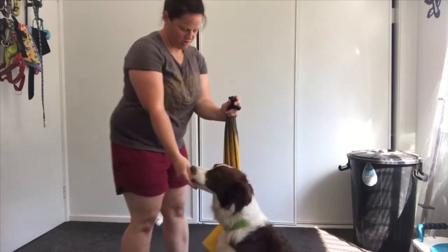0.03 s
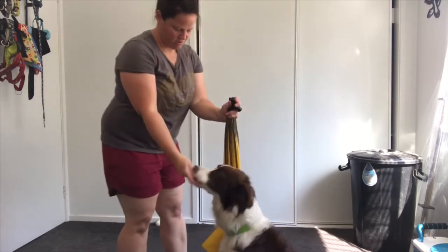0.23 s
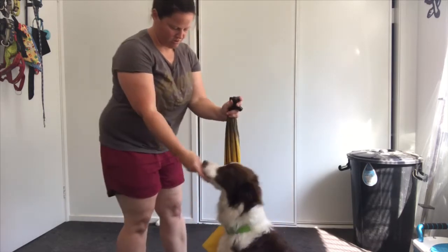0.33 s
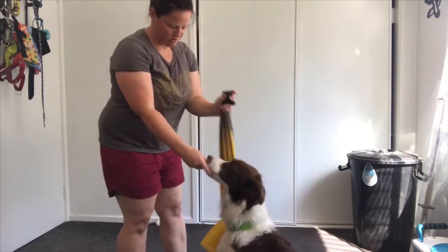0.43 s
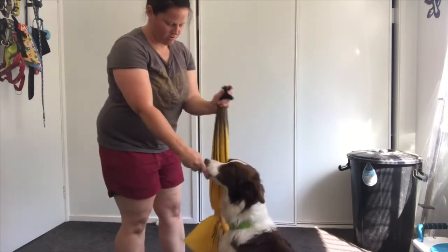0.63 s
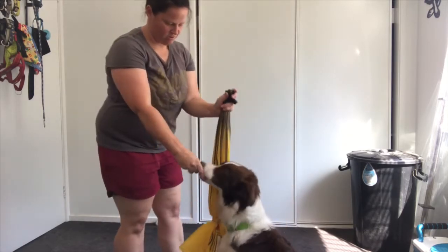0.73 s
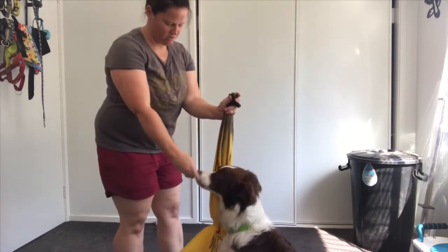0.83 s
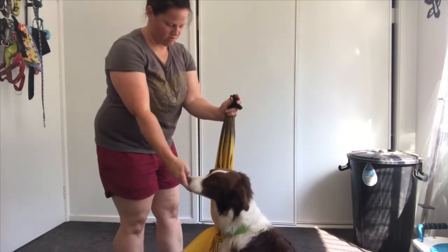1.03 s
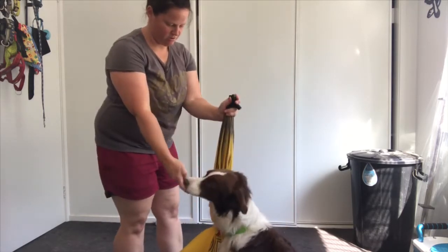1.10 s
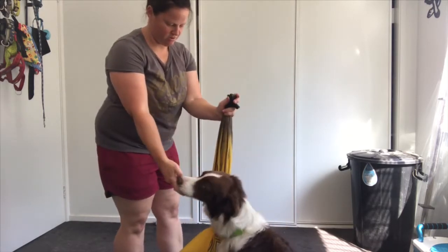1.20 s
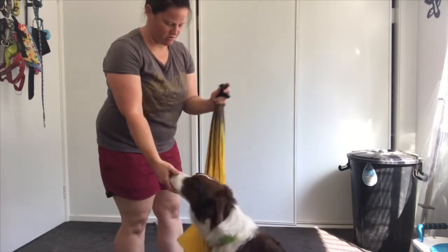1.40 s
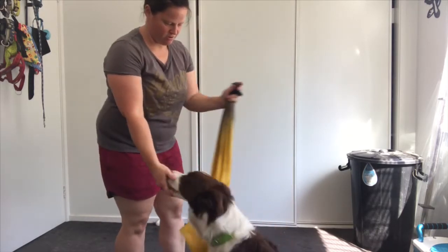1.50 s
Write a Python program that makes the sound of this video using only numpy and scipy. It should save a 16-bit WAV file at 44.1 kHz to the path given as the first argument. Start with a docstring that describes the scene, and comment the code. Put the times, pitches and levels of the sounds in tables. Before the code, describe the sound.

A hand-held training clicker snaps sharply at about 0.2 seconds and springs back, slightly brighter, at 0.35. A second pair follows at about 1.05 and 1.25 seconds, just as loud. Each metallic click leaves a brief small-room echo. Very faint rustling of a dog and handler runs underneath, with a soft bump near 0.6 and light scuffs around 0.8 and 1 second, over quiet room noise and a low hum.

```python
"""In a small, hard-walled room, a hand-held training clicker is pressed and let go twice.
Its steel tongue snaps through and rings for a few milliseconds, with one set of tones going in
and another coming back; the room's echo carries each snap on. Underneath are faint rustles
of a dog and its handler moving, room noise and a low hum."""
import sys
import numpy as np
from scipy import signal
from scipy.fft import rfft, irfft, next_fast_len
from scipy.io import wavfile
from scipy.ndimage import map_coordinates

SR = 44100
rng = np.random.default_rng(int(sys.argv[2]) if len(sys.argv) > 2 else 0)


def generate_wav(sig):
    """Save sig (samples, or channels by samples) to the path in sys.argv[1] as 16-bit PCM at SR."""
    pcm = np.round(np.clip(np.atleast_2d(sig).T, -1, 1) * 32767).astype(np.int16)
    wavfile.write(sys.argv[1], SR, pcm)


N = 68355

# the tongue buckles in, and springs back (t/s, level/dB)
PRESS_SNAPS = [(.2025, -0.5), (1.0725, -0.67)]
RELEASE_SNAPS = [(.3578, -0.4), (1.2410, -0.88)]
# ringing tones of tongue and case; wider ones die sooner (f/Hz, half width/Hz, level/dB)
BENT_TONES = [(1890, 303, 1), (3310, 750, -1.9), (4136, 163, 13), (4610, 200, -2.5), (5610, 340, 4.5),
              (6250, 220, 2), (7630, 650, 0.6), (8740, 480, 6), (9620, 190, 3.5), (11250, 240, 5),
              (11960, 590, -4.3), (14040, 1200, -3.0)]  # mainly near 4 kHz
RELAXED_TONES = [(1996, 363, 4.5), (3106, 270, 4.5), (3730, 1300, 0.2), (4340, 430, -1), (5390, 153, 4.7),
                 (5916, 437, 9), (7170, 280, -2.3), (8450, 210, 4), (9070, 720, -2.5), (11080, 276, 9),
                 (11500, 430, 8.5), (12460, 750, -1.5), (14300, 460, 0.5)]  # mainly near 6 and 11 kHz
def clicker():
    """The tongue snaps on every press and release, each time with a slightly different echo."""
    out = np.zeros(N)
    for events, tones in (PRESS_SNAPS, BENT_TONES), (RELEASE_SNAPS, RELAXED_TONES):
        for start, db in events:
            add(out, start, amp(db) * signal.fftconvolve(snap(tones), room_echo()))
    return out


# the small case gives off little bass (f/Hz, level/dB)
CASE_COLOUR = [(100, -19), (500, -11), (800, -7), (1100, -4), (1600, 0.5), (15000, 2)]
def snap(tones, crack_db=-14.5, size=4096):
    """The tongue flips in under a millisecond: a sharp crack and a short ring."""
    f = np.fft.rfftfreq(size, 1 / SR)
    ring_power = sum((amp(db) / (1 + ((f - hz) / width) ** 2)) ** 2 for hz, width, db in tones)
    gain = np.sqrt(amp(crack_db) ** 2 + ring_power) * amp(along(CASE_COLOUR, f))
    lag_s, lag_hz = .0008, 12000  # the treble trails the bass by this time at this frequency
    flip = np.exp(-1j * np.pi * lag_s * f ** 2 / lag_hz)
    return irfft(causal(gain) * flip)[:size // 2]


# how long the echo takes to fade by 60 dB (f/Hz, t/s)
ECHO_FADE = [(500, 0.23), (2000, 0.23), (4200, .24), (6000, 0.23), (10000, 0.21), (12000, .19),
             (15000, 0.15)]
# first bounces off the near walls, timed from the snap (t/s, level/dB)
WALL_BOUNCES = [(.0047, -16.5), (.0062, -16), (0.0088, -23)]
# the room favours some frequencies (f/Hz, level/dB)
ECHO_COLOUR = [(1500, 0.9), (2200, 1.5), (4000, -1), (6000, 7), (8500, 0.4), (11500, -1.4), (14500, 1)]
def room_echo(tail_db=-0.5, gap_s=0.0013, build_s=0.00092):
    """Sound arrives directly, then off the walls, blurring into a fading tail."""
    hz, times, bands = signal.stft(rng.standard_normal(SR // 2), SR, nperseg=256)
    fade = np.exp(-np.log(1000) * times / along(ECHO_FADE, hz)[:, None])
    tail = signal.istft(bands * fade, SR)[1]
    t = np.arange(len(tail)) / SR
    tail *= 1 - np.exp(-np.maximum(t - gap_s, 0) / build_s)
    echo = amp(tail_db) * tail / np.linalg.norm(tail)
    for delay, db in WALL_BOUNCES:
        add(echo, delay * (1 + .03 * rng.standard_normal()), amp([db]))
    echo = coloured(echo, ECHO_COLOUR)
    echo[0] += 1  # the direct sound
    return echo


# how loud the rustling is (t/s, level/dB)
RUSTLE_LEVELS = [(0, -70), (.3, -65.5), (.5, -59.5), (.63, -63), (.8, -60), (.92, -63.5), (1.05, -63.5),
                 (1.4, -64), (1.55, -69.5)]
# brief scuffs, soft low bumps and swells of rumble (t/s, level/dB, time to peak/s)
SCUFF_EVENTS = [(.125, -64.5, 0.01), (.817, -57, 0.012), (.970, -58.5, 0.011), (1.388, -70, 0.015)]
BUMP_EVENTS = [(0.571, -54.5, 0.012), (0.621, -64, .008)]
RUMBLE_EVENTS = [(.34, -57.5, 0.025), (.645, -59, 0.033), (1.16, -65, 0.036), (1.385, -62, .018)]
# each sound's balance of bass and treble (f/Hz, level/dB)
RUSTLE_COLOUR = [(100, -7), (400, -1), (1000, -3), (2000, -4.5), (5000, -8), (9000, -14.5), (15000, -20)]
SCUFF_COLOUR = [(100, -11), (500, -7), (1000, 6), (2000, 1.5), (4500, -4), (8000, -18), (15000, -30)]
BUMP_COLOUR = [(60, -25), (150, -14.5), (210, -2), (290, -1), (420, -12.5), (1500, -37), (8000, -66)]
RUMBLE_COLOUR = [(25, -24), (55, -4), (95, -1), (140, -9.5), (250, -26), (2000, -50)]
def movement(flutter_db=1):
    """Dog and handler shift: light rustling, a few scuffs, soft bumps and swells of low rumble."""
    t = np.arange(N) / SR
    rustle_db = np.interp(t, *np.transpose(RUSTLE_LEVELS)) + flutter_db * wobble(35.3)
    out = amp(rustle_db) * noise(RUSTLE_COLOUR)
    for events, colour in ((SCUFF_EVENTS, SCUFF_COLOUR), (BUMP_EVENTS, BUMP_COLOUR),
                           (RUMBLE_EVENTS, RUMBLE_COLOUR)):
        loudness = sum(amp(db) * swell(t - start, peak_s) for start, db, peak_s in events)
        out += loudness * noise(colour)
    return out


# the two tones of the hum (f/Hz, level/dB)
HUM_TONES = [(98, -68.5), (143, -72.5)]
def hum(waver_db=2):
    """A low hum wavers in loudness and slightly in pitch."""
    t = np.arange(N) / SR
    out = np.zeros(N)
    for hz, db in HUM_TONES:
        loudness = amp(db + waver_db * wobble(8.55))
        phase = 2 * np.pi * hz * t + 0.52 * wobble(9.7)
        out += loudness * np.sqrt(2) * np.sin(phase)
    return out


# the room noise is mostly bass (f/Hz, level/dB)
NOISE_COLOUR = [(16, -31), (27, -9), (42, -2.5), (70, 0.5), (120, -4.5), (330, -10), (700, -17),
                (1000, -17), (2000, -21.5), (6000, -28), (16000, -44.5)]
def room_noise(level_db=-63):
    """The steady, faint rush of a quiet room."""
    return amp(level_db) * noise(NOISE_COLOUR)


def amp(db):
    """Turns decibels into a multiplier."""
    return 10 ** (np.asarray(db) / 20)


def along(points, hz):
    """Reads between a table's rows on a pitch-like (log) frequency scale."""
    f, values = np.transpose(points)
    return np.interp(np.log(hz + 1), np.log(f + 1), values)


def causal(gain):
    """A filter with these gains that never rings before the sound arrives."""
    cepstrum = irfft(np.log(gain))
    half = len(cepstrum) // 2
    cepstrum[1:half] *= 2
    cepstrum[half + 1:] = 0
    return np.exp(rfft(cepstrum))


def coloured(x, colour):
    """Shapes a sound's bass and treble by a table (f/Hz, level/dB)."""
    size = 2 * next_fast_len(len(x))
    gain = amp(along(colour, np.fft.rfftfreq(size, 1 / SR)))
    return irfft(rfft(x, size) * causal(gain))[:len(x)]


def noise(colour):
    """Shaped noise with an average (rms) strength of 1."""
    x = coloured(rng.standard_normal(N), colour)
    return x / np.sqrt(np.mean(x ** 2) + 1e-20)


def wobble(rate):
    """A smooth curve through `rate` random points a second."""
    points = rng.standard_normal(int(N * rate / SR) + 4)
    return map_coordinates(points, [np.arange(N) * rate / SR])


def swell(t, peak_s):
    """Rises to 1 at peak_s, then dies away."""
    progress = np.maximum(t, 0) / peak_s
    return progress * np.exp(1 - progress)


def add(track, start_s, sound):
    """Mixes a sound into the track from start_s on."""
    part = track[max(round(start_s * SR), 0):][:len(sound)]
    part += sound[:len(part)]


def scene():
    """Clicks over the quiet room, in one channel."""
    return (clicker() + movement() + hum() + room_noise())[None]


def record(dry):
    """Cuts away the highest treble, above 16 kHz."""
    return signal.sosfilt(signal.ellip(10, .1, 80, 16000, fs=SR, output="sos"), dry)


dry = scene()
out = record(dry)
generate_wav(out)
```